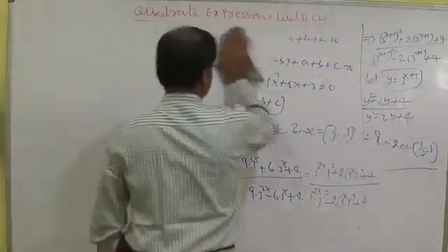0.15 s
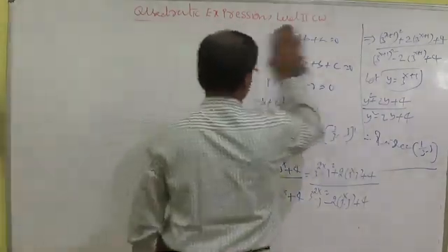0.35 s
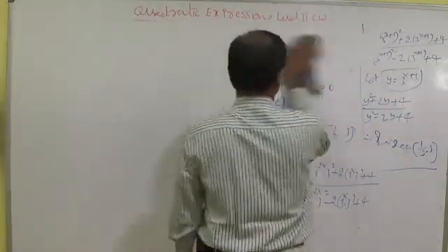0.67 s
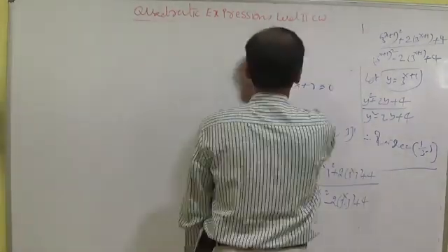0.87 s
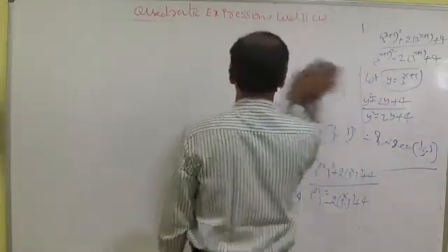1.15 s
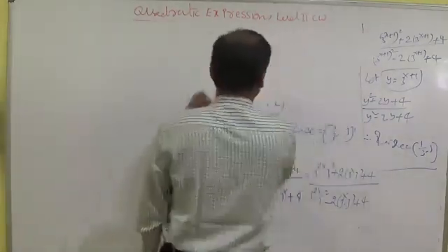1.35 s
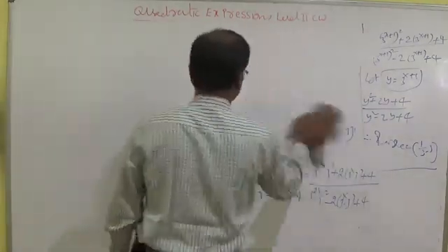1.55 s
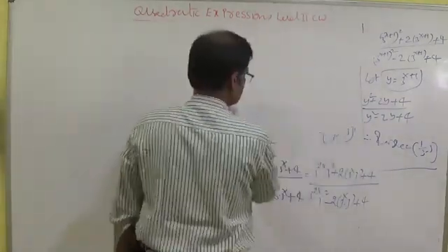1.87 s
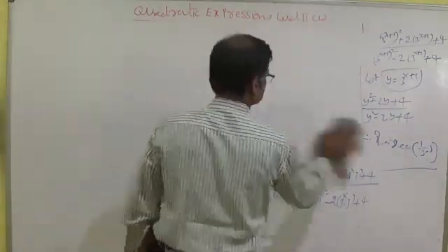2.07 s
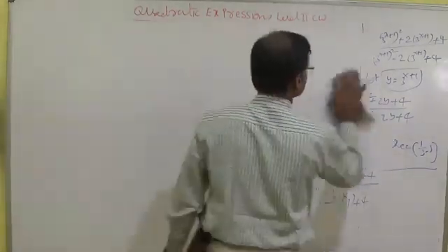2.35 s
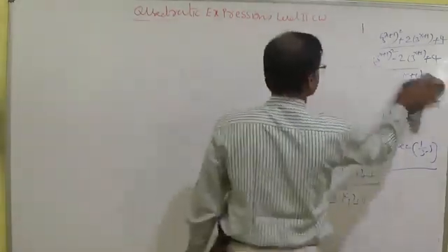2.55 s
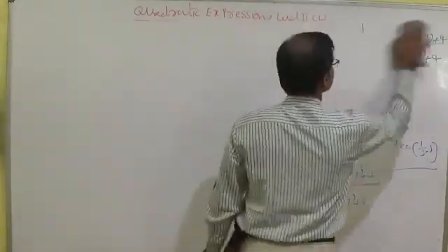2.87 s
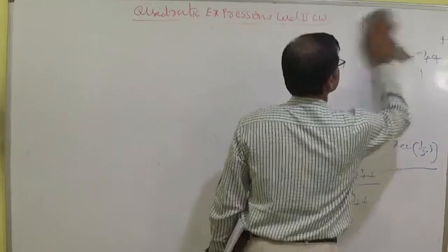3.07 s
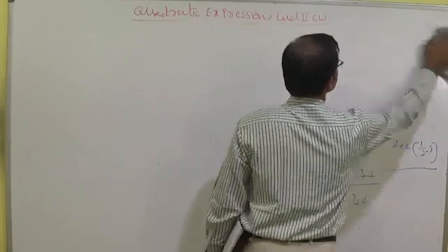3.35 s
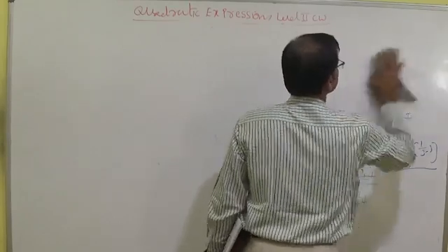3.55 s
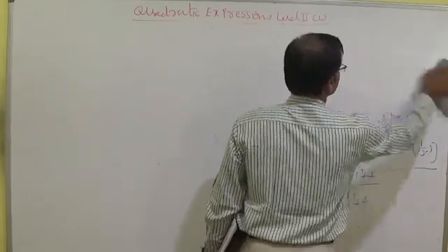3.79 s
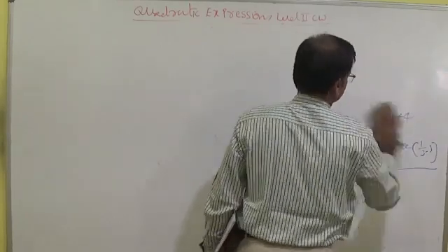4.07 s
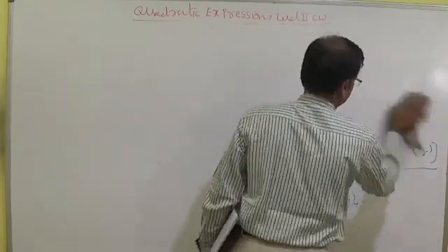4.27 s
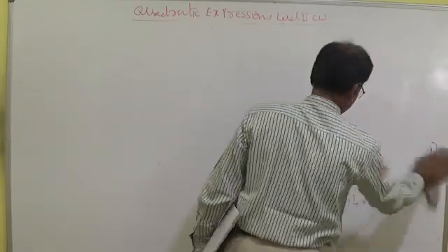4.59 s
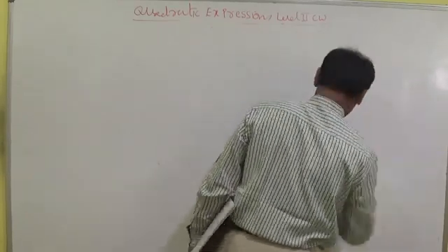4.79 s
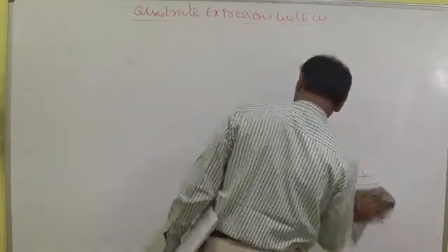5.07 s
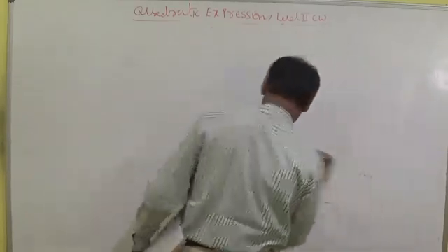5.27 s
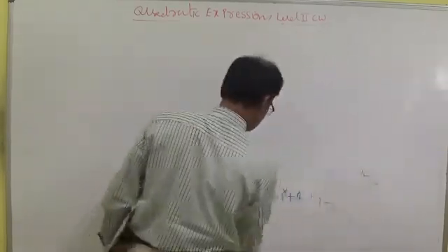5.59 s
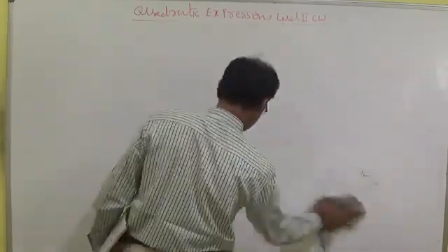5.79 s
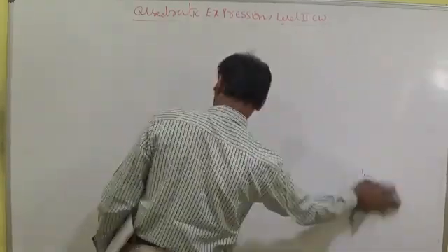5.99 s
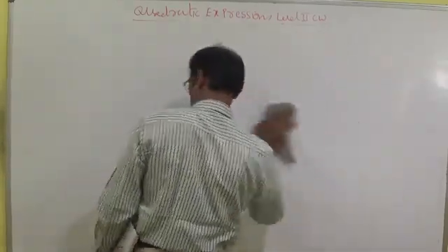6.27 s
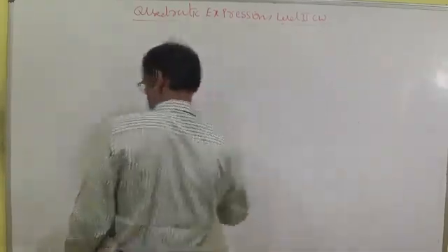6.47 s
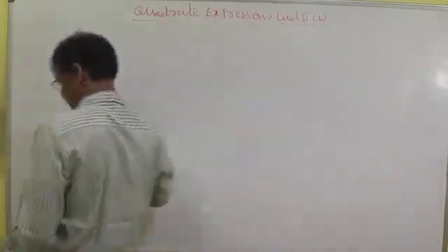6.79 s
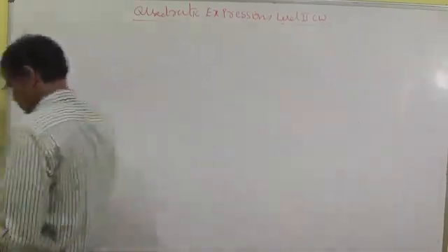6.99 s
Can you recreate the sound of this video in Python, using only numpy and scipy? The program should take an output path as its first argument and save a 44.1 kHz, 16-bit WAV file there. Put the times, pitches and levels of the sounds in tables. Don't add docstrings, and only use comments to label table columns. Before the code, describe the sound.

A cloth duster rubs a whiteboard in a bare, reverberant classroom. Loud hard clinks strike almost at once and again at half a second, then dull panel booms recur with short raspy swishes. Another bright metallic clink comes near the middle. Later the hits soften to light bumps, then quick swishes and crisp little ticks cluster toward the end. Stereo microphone in the room, faint steady hiss, little deep bass and dulled extreme highs.

```python
import sys
import numpy as np
from scipy import signal
from scipy.fft import rfft, irfft, next_fast_len
from scipy.io import wavfile
from scipy.ndimage import map_coordinates

SR = 44100
rng = np.random.default_rng(int(sys.argv[2]) if len(sys.argv) > 2 else 0)


def materialize(psi):
    bounded = np.clip(np.atleast_2d(psi).T, -1, 1)
    quanta = np.round(bounded * 32767).astype(np.int16)
    wavfile.write(sys.argv[1], SR, quanta)


def natural_amplitude(level_db):
    exponent = np.asarray(level_db, float) / 20
    return 10 ** exponent


N = 314857

# fastest moment t/s, rasp level/dB, length/s, drag level relative to rasp/dB
STROKES = [(.005, -57, 0.13, 7), (0.341, -44.5, 0.048, -4), (0.397, -54, 0.065, -1),
           (1.141, -38.5, .11, -8.5), (1.207, -49, 0.073, 0), (1.3, -67, 0.11, 12),
           (1.658, -55.5, 0.16, -2), (1.807, -62, 0.17, 1.5), (1.935, -48, 0.1, -4.5),
           (2.097, -39.5, 0.066, -19), (2.19, -71.5, 0.16, 14), (2.36, -67, 0.093, 3.5),
           (2.47, -66, .12, 5.5), (2.702, -44, 0.1, -25), (4.634, -63.5, 0.024, 6), (5.34, -44, 0.093, -4),
           (5.58, -53.5, 0.3, -3), (5.753, -47, 0.073, -17), (5.825, -45, 0.089, -5), (5.91, -63, .07, 0),
           (6.157, -45, 0.099, -2.5), (6.256, -44.5, 0.12, -11.5), (6.361, -51.5, 0.092, -10),
           (6.433, -49.5, 0.059, -8), (6.485, -45.5, 0.042, -4), (6.54, -59, 0.052, -3),
           (6.597, -58, 0.032, 4), (6.777, -58.5, 0.057, -2.5), (7.124, -43, 0.026, -12)]
# f/Hz, density level/dB per Hz
RASP_SPECTRUM = [(1470, -24), (2500, -12.5), (2830, -11.5), (4180, -8), (5910, -4.5), (10100, 3),
                 (11200, -1.5), (14600, -43), (22000, -120)]
# f/Hz, density level/dB per Hz
DRAG_SPECTRUM = [(600, -15.5), (1200, -10.5), (2200, -4), (4000, -4.5), (6500, -6.5), (11000, -17)]
# t/s, boom peak level/dB, snap relative level/dB, hardness/dB per octave
THUDS = [(0.009, -50.5, -5, -11), (0.052, -42.5, 27.5, -7), (0.383, -42.5, -8, -0.5),
         (0.497, -41.5, -8, 0.5), (0.867, -35.5, 9, 0.5), (1.387, -33, 9.5, 1), (1.929, -38.5, 5.5, 0),
         (2.536, -40.5, 4.5, 3.5), (2.911, -41, 7, 2.5), (3.067, -42, -6, 4.5), (3.356, -33.5, -9, 5),
         (3.755, -49, 9, 3.5), (4.163, -41.5, 7, 3.5), (4.563, -46, 3.5, 3.5), (4.648, -49, -10, 2.5),
         (4.916, -38.5, 6, 4), (5.346, -49, -3, -1), (5.466, -45, -2, -10), (5.723, -50, -10, -12),
         (6.304, -46, 3, -1)]
# f/Hz, density level/dB per Hz
PANEL_SPECTRUM = [(60, -23), (150, -20.5), (300, -3.5), (550, 1.5), (850, -1), (1150, -14), (2000, -20),
                  (4000, -21), (8000, -71.5)]
# t/s, peak level/dB, centre f/Hz, width/share of centre, room level/dB
TICKS = [(.322, -34, 1500, 0.95, -2), (.746, -32.5, 4000, 2.3, 3.5), (.803, -33, 2380, 1.7, 3.5),
         (.804, -26.5, 7140, 0.5, 0.5), (3.097, -38.5, 4580, 1.5, 9), (3.995, -39.5, 2410, 0.98, -2.5),
         (4.398, -44.5, 2450, .45, -9), (4.8, -46, 2560, .45, -6), (4.92, -53, 111, 1, -1),
         (5.078, -47.5, 9500, 0.66, 6), (5.499, -37, 8060, 0.84, -7), (5.861, -27.5, 4550, 0.54, -1),
         (6.061, -35, 4670, 0.54, 3.5), (6.406, -34.5, 9000, 0.51, -12), (6.471, -37.5, 1710, 0.62, 1.5),
         (6.476, -42.5, 810, 0.83, -8), (6.494, -27, 8000, 1.1, -3.5), (6.591, -29, 9900, 0.61, -7),
         (6.845, -44, 8050, .95, -6), (7.026, -31.5, 3700, 1.07, 2), (7.029, -32.5, 2580, 0.05, -7.5),
         (7.105, -58, 347, 1.3, 7), (7.106, -35.5, 9000, 0.55, 9)]
# t/s, peak level/dB
BUMPS = [
    (0.761, -51.5),
    (1.3, -52),
    (2.822, -60),
    (3.168, -53),
    (3.609, -55.5),
    (4.02, -54.5),
    (4.42, -59.5),
    (4.84, -57),
]
# t/s, ring level/dB, crack level/dB, room level/dB
CLINKS = [
    [(.0515, -10, -14, -5.5), (.057, -25, -10.5, -6.5)],
    [(.498, -15, -8.5, 5.5)],
    [(3.066, -26.5, -38, -2.5)],
    [(3.352, -51, -26, 8), (3.359, -12, -13.5, 3.5), (3.53, -43, -40, 13)],
]
# f/Hz, width/Hz, level/dB
PART_MODES = [
    [(3130, 330, 0), (5280, 570, 7), (6800, 830, 4), (10530, 1450, 6.5)],
    [(2463, 48, -1.5), (2775, 96, -5.5), (3670, 220, -10), (4170, 78, -9), (4970, 95, -21), (6280, 25, 8.5),
     (6660, 95, 7.5), (6660, 46, -7), (7400, 88, -3), (7560, 54, -6), (8840, 110, 0.5), (9230, 220, 2.5),
     (9100, 71, 0), (10470, 510, 0)],
    [(1500, 890, -4.5), (3360, 620, 0.5), (5700, 530, 3.5), (8030, 450, -4)],
    [(2230, 83, -20.5), (2490, 58, -20), (4020, 43, -14.5), (5500, 110, -15), (6470, 110, -2),
     (7570, 110, -11), (8020, 47, -5), (8410, 105, -2), (9260, 99, -21), (10540, 91, 6), (10700, 38, -26.5)],
]
# f/Hz, density level/dB per Hz
HUSH_SPECTRUM = [(15, -56), (25, -28.5), (161, -4), (290, -3.5), (356, 1.5), (564, 3.5), (2300, -1),
                 (2550, 5), (2750, -1), (3930, -3), (10100, -4), (11200, -3), (14600, -44), (22000, -120)]
# f/Hz, correlation/1
LIKENESS = [(60, 1), (170, 0.97), (490, 0.92), (1200, 0.68), (2500, 0.64), (5000, 0.63), (9000, 0.79)]
# f/Hz, t60/s
ROOM_T60 = [(150, 1.14), (500, 1.61), (1500, 1.48), (4000, 1.15), (7000, 0.89), (11000, 0.72)]
# f/Hz, gain level/dB
MIC_RESPONSE = [(30, -27), (100, -8), (250, 4.5), (10900, 1), (11100, -11), (11300, -44), (13000, -47),
                (20000, -72)]


def unit(x):
    return x / np.sqrt(np.mean(x ** 2) + 1e-20)


def along(points, hz):
    f, value = np.transpose(points)
    return np.interp(np.log(hz + 1), np.log(f + 1), value)


def filtered(x, response):
    m = next_fast_len(x.shape[-1] + 8192)
    spectrum = rfft(x, m) * response(np.fft.rfftfreq(m, 1 / SR))
    return irfft(spectrum, m)[..., :x.shape[-1]]


def spread(pair, share):
    def turn(hz):
        return np.arccos(np.clip(share * along(LIKENESS, hz), -1, 1)) / 2

    mid, side = filtered(pair, lambda hz: np.array([np.cos(turn(hz)), np.sin(turn(hz))]))
    return np.array([mid + side, mid - side])


def modes(table):
    def response(f):
        total = 0
        for k, (centre, width, db) in enumerate(table):
            resonance = 1j * f * width / (centre * centre - f * f + 1j * f * width)
            total = total + (-1) ** k * natural_amplitude(db) * resonance
        return total
    return response


def burst(t60, response):
    t = np.arange(SR // 8) / SR
    rattle = rng.standard_normal(len(t)) * natural_amplitude(-60 * t / t60)
    impulse = t == 0
    direct, walls = filtered(np.array([rattle, impulse]), response)
    direct = direct / np.abs(direct).max()
    return np.array([direct, walls * np.linalg.norm(direct) / np.linalg.norm(walls)])


def add(bus, s, sound):
    start = round(s * SR)
    bus[:, start:][:, :sound.shape[1]] += sound[:, :N - start]


def hush():
    noise = filtered(rng.standard_normal((2, N)),
                     lambda hz: natural_amplitude(along(HUSH_SPECTRUM, hz) - along(MIC_RESPONSE[:3], hz)))
    return natural_amplitude(-61) * unit(spread(noise, 0.67))


def room(spot, wet_db):
    direct, walls = spot
    hz, t, z = signal.stft(rng.standard_normal((2, SR)), SR, nperseg=256)
    decay = natural_amplitude(-60 * t / along(ROOM_T60, hz)[:, None])
    tail = signal.istft(z * decay, SR, nperseg=256)[1]
    early = 1 + 1.4 * natural_amplitude(-60 * np.arange(tail.shape[1]) / SR / 0.32)
    tail = spread(tail * early, 1.04)
    tail = tail / np.linalg.norm(tail[0])
    delayed = np.pad(walls, (130, 0))[None]
    wet = signal.fftconvolve(delayed, tail, axes=1)[:, :N]
    return direct + natural_amplitude(wet_db) * wet


def ticks():
    spots = np.zeros((2, 2, N))
    bumps = [(s, db, 176, 1, -1.5) for s, db in BUMPS]
    for k, (s, db, hz, share, room_db) in enumerate([*TICKS, *bumps]):
        body = modes([(hz, share * hz, 0)])
        tick = burst(0.0065, lambda f: body(f) ** 2)
        add(spots[k % len(spots)], s, natural_amplitude(db) * natural_amplitude([[0], [room_db]]) * tick)
    return spots


def thuds():
    spots = np.zeros((3, 2, N))
    for k, (s, db, snap_db, hard_db) in enumerate(THUDS):
        boom = burst(0.067, lambda f: natural_amplitude(along(PANEL_SPECTRUM, f) + hard_db * np.log2((f + 150) / 700)))
        snap = burst(0.016, modes([(3250, 4600, -9.5), (9500, 2500, -3.5)]))
        add(spots[k % len(spots)], s, natural_amplitude(db) * boom)
        add(spots[k % len(spots) - 1], s, natural_amplitude(db + snap_db) * snap * natural_amplitude([[0], [-4]]))
    return spots


def clinks():
    spots = np.zeros((2, 2, N))
    for part, blows in zip(PART_MODES, CLINKS):
        for s, ring_db, crack_db, room_db in blows:
            crack = burst(0.0025, modes([(9400, 7400, 0)]))
            ring = burst(0.011, modes(part))
            to_room = natural_amplitude([[0], [room_db]])
            add(spots[0], s, natural_amplitude(ring_db) * ring * to_room)
            add(spots[1], s, natural_amplitude(crack_db) * crack * to_room)
    return spots


def fibres(spectrum, per_s, scatter_db):
    caught = rng.random(N) < per_s / SR
    size = natural_amplitude(scatter_db * rng.exponential(size=N)) * rng.standard_normal(N)
    clumps = map_coordinates(rng.standard_normal(N // 400 + 4), [np.arange(N) / 400])
    clicks = caught * size * natural_amplitude(1.76 * clumps)
    return unit(filtered(clicks, lambda hz: natural_amplitude(along(spectrum, hz))))


def cloth():
    s, db, length, drag_db = np.transpose(STROKES)[..., None]
    t = np.arange(0, N, 64) / SR
    rise_share, ends_db, drag_lag_s = 0.53, -9, 0.0059

    def swell(late):
        phase = late / np.where(late < 0, rise_share * length, (1 - rise_share) * length)
        return db + ends_db * phase ** 2

    def smooth(level):
        return np.interp(np.arange(N) / SR, t, level)

    rasp_level = smooth(natural_amplitude(swell(t - s)).sum(0))
    drag_level = smooth(natural_amplitude(swell(t - s - drag_lag_s) + drag_db).sum(0))
    rasp = rasp_level * fibres(RASP_SPECTRUM, 14000, 1.5)
    drag = drag_level * fibres(DRAG_SPECTRUM, 12000, 1.2)
    return natural_amplitude(-2.5) * rasp + natural_amplitude(-2.6) * drag


def scene():
    wipe = cloth()
    hits = [(thuds(), 6), (ticks(), 3), (clinks(), 7)]  # source, room level/dB
    heard = sum(room(spot, wet_db) for spots, wet_db in hits for spot in spots)
    return heard + room((wipe, wipe), -2.5) + hush()


def band_limit(x):
    return signal.sosfilt(signal.butter(12, 12320, fs=SR, output="sos"), x)


def record(dry):
    mix = filtered(dry, lambda hz: natural_amplitude(along(MIC_RESPONSE, hz)))
    return band_limit(mix)


dry = scene()
out = record(dry)
materialize(out)
```